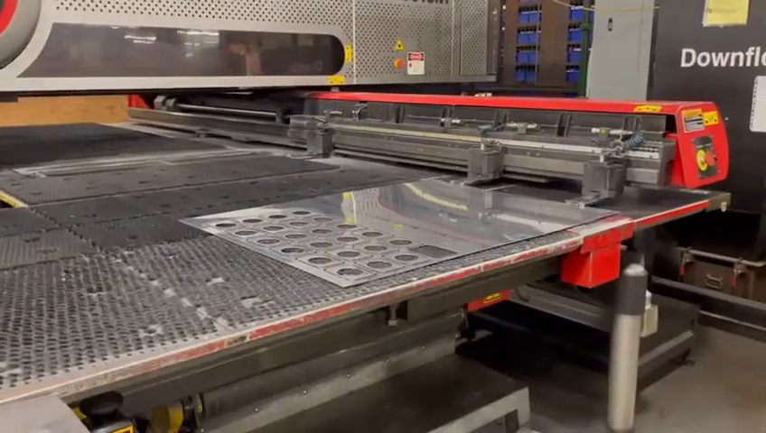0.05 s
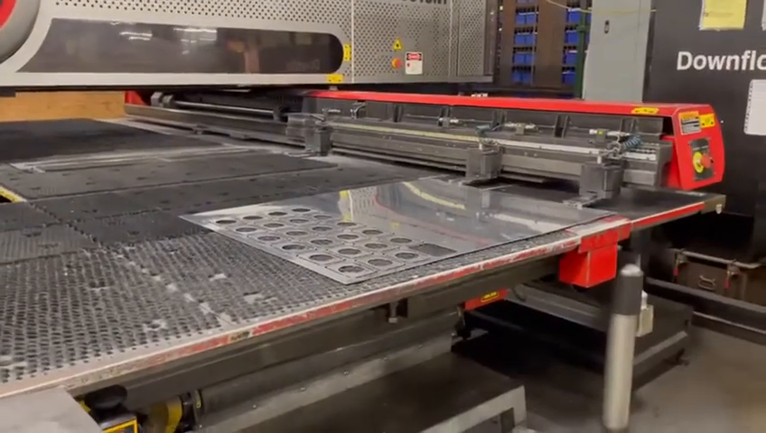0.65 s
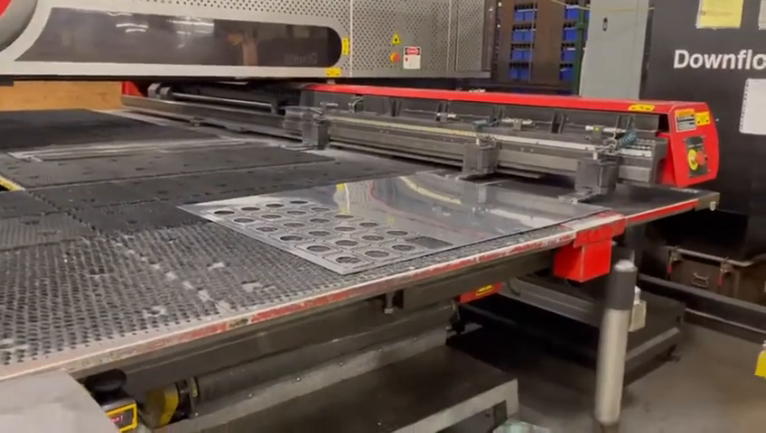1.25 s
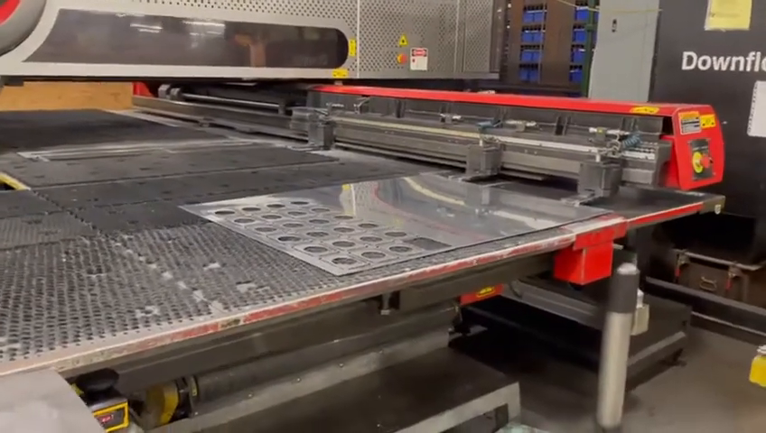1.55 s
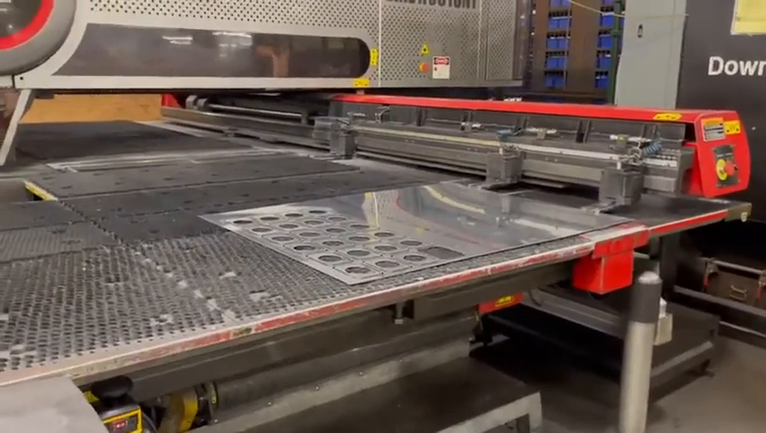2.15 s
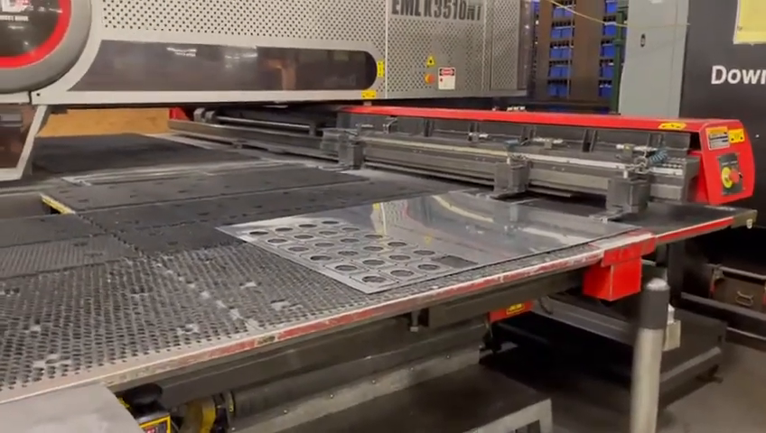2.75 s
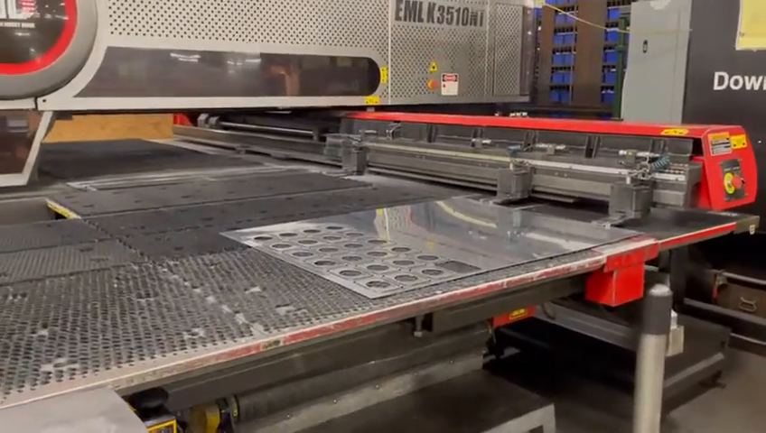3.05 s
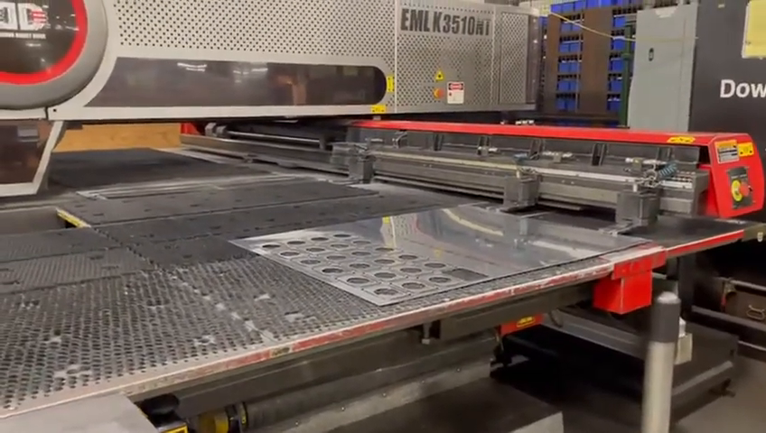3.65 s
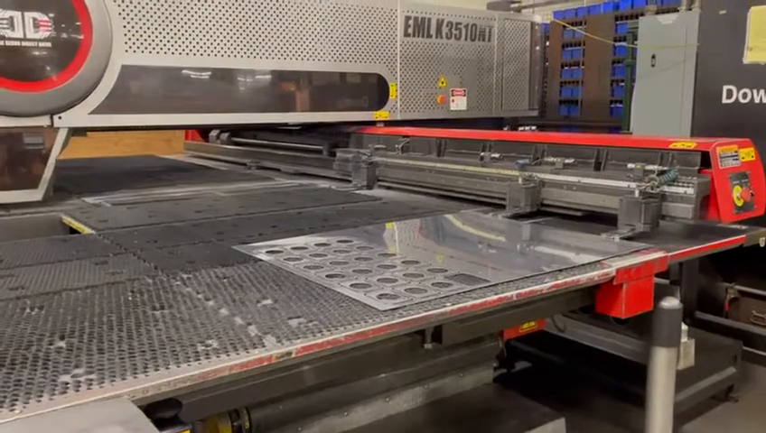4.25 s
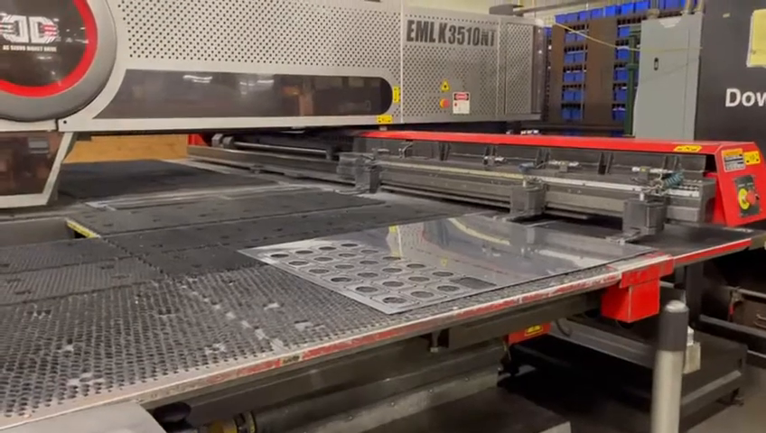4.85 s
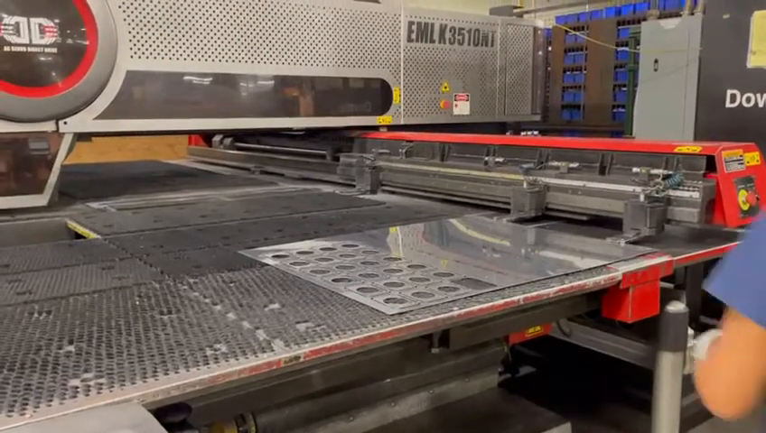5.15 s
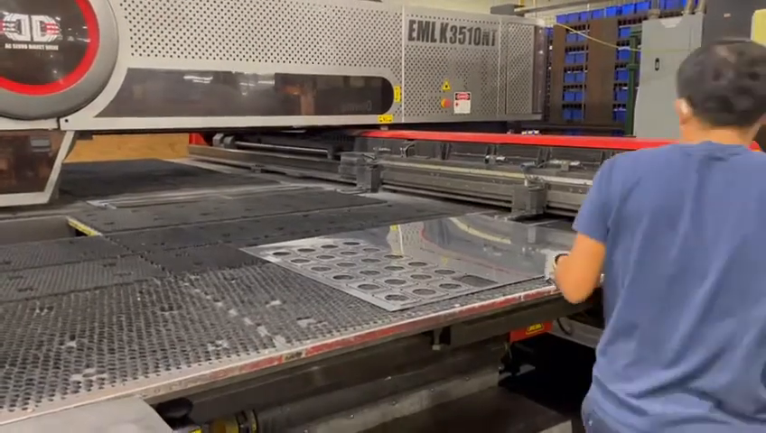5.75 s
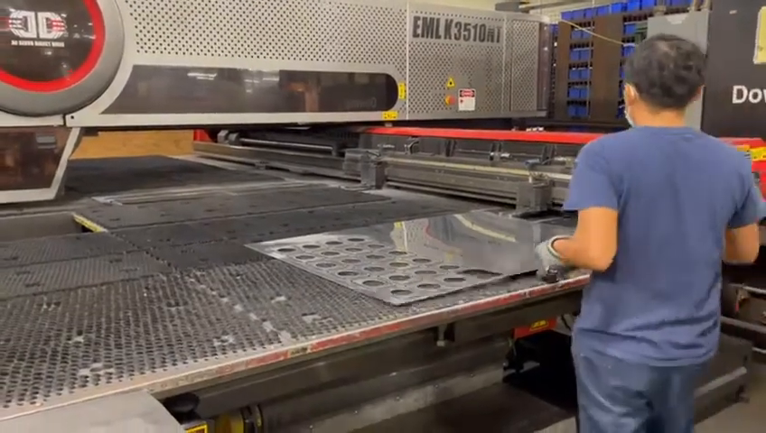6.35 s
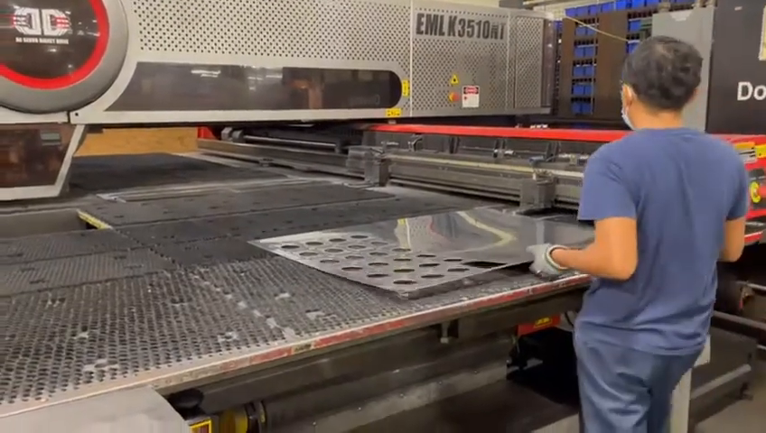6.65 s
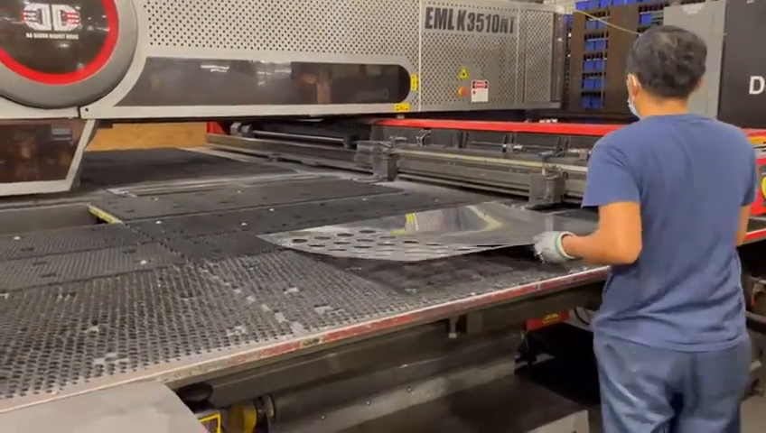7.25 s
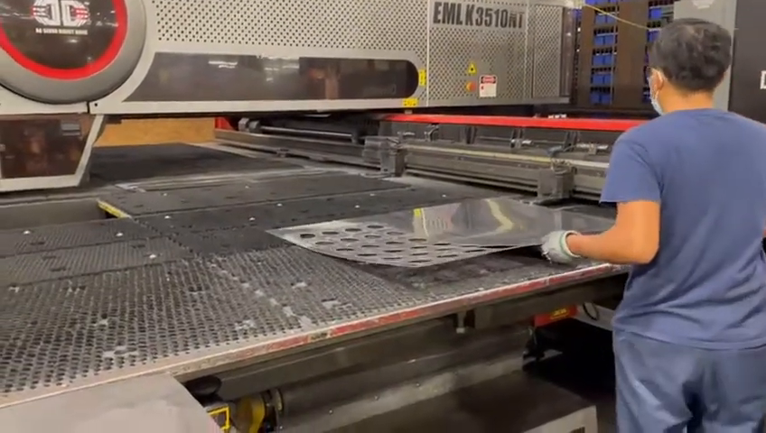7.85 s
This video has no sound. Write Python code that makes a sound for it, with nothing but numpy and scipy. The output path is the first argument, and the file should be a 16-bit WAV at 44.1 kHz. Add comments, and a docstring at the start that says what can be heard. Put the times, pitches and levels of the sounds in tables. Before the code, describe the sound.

A large punch press idles in a workshop hall from start to finish, heard in stereo. Its motors make a low, throbbing hum under the broad roar of a cooling fan. A pump hum and other tones waver slightly, with a faint high whine and occasional soft swells of hiss. Faint, dull knocks come from the housing at about 1.6, 2.3, 3.7 and 4.5 seconds. At about 6.5 seconds, a thin perforated steel sheet is lifted from the table. It drags with a light gritty hiss, bends with short hollow wobbles, and strikes the table in a quick, uneven run of metallic clatters and dry clacks that stand out above the machine. Each contact rings briefly with a short hall echo. The clatter is busiest until about 7.4 seconds, followed by a last wobble, a soft scrape and a lighter tap near 7.7 seconds as the hum continues.

```python
"""A workshop hall, where a turret punch press idles: two big motors throb, a pump hums, a cooling fan
roars, the servo drives whine and the housing gives a few dull knocks.
Near the end a worker lifts a perforated steel sheet. It drags with a gritty hiss, wobbles as it bends,
and clatters and clacks on the table. Each chattering contact rings the sheet's modes and the hall."""
import sys
import numpy as np
from scipy import signal
from scipy.fft import rfft, irfft, next_fast_len
from scipy.io import wavfile
from scipy.ndimage import map_coordinates

SR = 44100
rng = np.random.default_rng(int(sys.argv[2]) if len(sys.argv) > 2 else 0)


def transcribe(u):
    """Save the signal u as a 16-bit wav file named by the first command-line argument.

    u: samples, shape (n,) or (channels, n), limited to [-1, 1]; the rate is SR.
    q: integer samples, one column per channel.
    """
    v = np.clip(np.atleast_2d(u).T, -1, 1)
    q = np.round(v * 32767).astype(np.int16)
    wavfile.write(sys.argv[1], SR, q)


N = 348831
TIME = np.arange(N) / SR


def amp(db):
    """Decibels to gain."""
    return 10 ** (np.asarray(db) / 20)


def unit(x):
    """x at rms 1."""
    return x / np.sqrt(np.mean(x ** 2) + 1e-20)


def along(points, hz):
    """(f/Hz, value) points read on a log frequency axis."""
    f, v = np.transpose(points)
    return np.interp(np.log(hz + 1), np.log(f + 1), v)


def automation(points):
    """(t/s, value) points joined by straight ramps."""
    return np.interp(TIME, *np.transpose(points))


def bump(s, half_s):
    """A smooth rise and fall around second s."""
    return np.exp(-((TIME - s) / half_s) ** 2)


def swells(rows):
    """A gain envelope with one bump for each (t/s, half length/s, level/dB)."""
    return sum(amp(db) * bump(s, half_s) for s, half_s, db in rows)


def wobble(rate, size=N):
    """A smooth random curve, rate knots a second."""
    knots = rng.standard_normal(int(size * rate / SR) + 4)
    return map_coordinates(knots, [np.arange(size) * rate / SR])


def filtered(x, response):
    """x through an EQ given as gain against frequency."""
    size = next_fast_len(N + SR // 2)
    return irfft(rfft(x, size) * response(np.fft.rfftfreq(size, 1 / SR)), size)[..., :N]


def bandpass(x, low_hz, high_hz):
    """x through a gentle band filter."""
    return signal.sosfilt(signal.butter(2, [low_hz, high_hz], "bandpass", fs=SR, output="sos"), x)


def noise(response):
    """Two unrelated noises of rms 1 with the same colour."""
    return unit(filtered(rng.standard_normal((2, N)), response))


def add(track, s, sound):
    """Mix a sound into a track from second s."""
    room = track[:, round(s * SR):][:, :sound.shape[1]]
    room += sound[:, :room.shape[1]]


# stereo width by frequency, with opposite phase around 8 kHz: f/Hz, left-right correlation
CORRELATION = [(70, 1), (330, .83), (550, .36), (1100, .26), (1600, 0), (2100, .4), (2800, .28),
               (4200, .58), (5400, .32), (6600, .8), (7600, -1), (9200, -1), (10000, .5), (10600, 1)]

def stereo(pair):
    """Two unrelated signals become mid and side, then left and right; width varies with frequency."""
    def shares(hz):
        turn = np.arccos(np.clip(along(CORRELATION, hz), -1, 1)) / 2
        return np.array([np.cos(turn), np.sin(turn)])
    mid, side = filtered(pair, shares)
    return np.array([mid + side, mid - side])


# pitch of the drone: t/s, f/Hz
DRONE_HZ = [(0, 59.3), (1.3, 60.3), (2.3, 59.5), (3.9, 60), (4.8, 59.6), (5.6, 61), (6.3, 61.3),
            (6.7, 59.5)]
# irregular swells of the low hum: peak t/s, half length/s, added level/dB
DRONE_SWELLS = [(.33, .04, -22), (.43, .04, -20), (.56, .035, -22), (1.12, .035, -21), (1.55, .04, -19),
                (1.75, .04, -22), (2.11, .04, -24), (2.87, .035, -22), (3.92, .035, -19), (4.66, .08, -16),
                (4.83, .12, -18), (5.12, .035, -23), (5.25, .035, -19), (5.39, .07, -23), (5.81, .04, -14),
                (6.2, .035, -21), (6.36, .035, -19)]

def drone(level_db=-24, second_db=-3, wander_hz=.8, throb_hz=6.86, first_throb_s=.11):
    """Two big motors run at slightly different speeds, so their hum throbs; now and then it swells."""
    phase = 2 * np.pi * np.cumsum(automation(DRONE_HZ) + wander_hz * wobble(7)) / SR
    beat = 2 * np.pi * throb_hz * (TIME - first_throb_s) + .6 * wobble(3)
    swell = swells(DRONE_SWELLS)
    first = np.sin(phase)
    second = amp(second_db) / (1 + swell / amp(level_db)) * np.sin(phase - beat)
    return amp(level_db) * unit(first + second) + swell * first


# colours of the roar and of the air hiss: f/Hz, relative level/dB
ROAR_EQ = [(20, -27), (40, -12), (55, -2), (68, -.5), (80, -2.5), (100, -4), (116, -4.5), (138, -8.5),
           (165, -8.5), (192, -11.5), (222, -11.5), (255, -8), (292, -9.5), (322, -13.5), (385, -10.5),
           (440, -14), (510, -15.5), (680, -17.5), (780, -18), (880, -20), (980, -22.5), (1160, -22),
           (1300, -24.5), (1390, -22.5), (1480, -24.5), (2000, -27.5), (3000, -33), (5500, -37.5),
           (11500, -48.5)]
HISS_EQ = [(600, -20), (1400, -1), (2700, 0), (4500, -22)]
# breaths of hiss: peak t/s, half length/s, level/dB
HISS_SWELLS = [(1.2, .1, -43), (2.267, 0.11, -39.5), (4.563, 0.091, -42), (4.85, .12, -43), (5.2, .2, -42),
               (6.296, .15, -46)]

def air_roar():
    """Rushing air and machinery make a broad, slightly fluttering bed, with soft swells of hiss."""
    level_db = -19 + .38 * wobble(7.8) + .1 * wobble(.91)
    roar = amp(level_db) * noise(lambda hz: amp(along(ROAR_EQ, hz)))
    hiss = swells(HISS_SWELLS) * noise(lambda hz: amp(along(HISS_EQ, hz)))
    return roar + hiss


# the two lower blade tones: f/Hz, half width/Hz, relative level/dB
BLADE_TONES = [(278.6, 5.5, -39), (557.5, 7, -38)]
# fader of the top blade tone: t/s, level/dB
TOP_BLADE_FADER = [(.15, -35), (1.0, -44), (2.1, -36), (2.7, -39.5), (3.4, -35), (4.05, -42), (4.4, -37),
                   (7.9, -37)]

def fan_blades(top_hz=837.5, top_width_hz=9):
    """The fan's blades sing three fuzzy tones, each a narrow band of noise."""
    def fuzzy(centre, width):
        return noise(lambda hz: 1 / (1 + ((hz - centre) / width) ** 2))
    lower = amp(1.5) * sum(amp(db) * fuzzy(centre, width) for centre, width, db in BLADE_TONES)
    return lower + amp(automation(TOP_BLADE_FADER)) * fuzzy(top_hz, top_width_hz)


# hum of motors, mains and panels: f/Hz, level/dB
HUM_TONES = [(83.4, -32), (88.8, -35), (156, -38), (176.5, -41), (204.8, -40), (235.5, -40), (298.8, -39),
             (354, -38), (418.6, -45), (467, -48), (472.4, -47), (599, -49), (1147, -45.5), (1164, -51),
             (1300, -50), (1844, -56), (1939, -56), (2064, -57), (2293, -57), (2523, -56), (2752, -58)]

def hum(lines=HUM_TONES, waver=.35, rate=2.5):
    """Held tones whose strength and phase drift slowly in the hall's standing waves."""
    out = np.zeros((2, N))
    knots = np.arange(0, N / SR + 1, 1 / rate)
    for hz, db in lines:
        carrier = np.exp(2j * np.pi * hz * TIME)
        for channel in out:
            start = np.exp(2j * np.pi * rng.random())
            drift = waver * (rng.standard_normal((len(knots), 2)) @ [1, 1j])
            channel += amp(db) * unit((np.interp(TIME, knots, start + drift) * carrier).real)
    return out


# faders of the four tones below: t/s, level/dB
PUMP = [(0.0, -26), (1.06, -31), (1.14, -45), (1.58, -25.5), (1.84, -34.5), (2.42, -26.5), (2.54, -30.5),
        (2.88, -30), (3.0, -41), (3.1, -32.5), (3.52, -30.5), (3.82, -40), (3.96, -32), (4.24, -35),
        (4.46, -20.5), (4.56, -44), (4.96, -28), (5.1, -42), (5.2, -35), (5.7, -40), (6.08, -23),
        (6.26, -50), (6.42, -36), (6.68, -30.5), (7.36, -28), (7.5, -37), (7.58, -32), (7.84, -33)]
FAN = [(0.0, -35.5), (1.06, -28), (1.54, -43), (1.72, -30.5), (2.74, -42), (3.12, -27.5), (3.66, -30.5),
       (4.66, -31.5), (4.92, -26), (5.1, -40), (5.34, -30), (5.52, -40), (5.72, -29), (6.3, -33.5),
       (6.52, -43), (6.7, -31), (7.12, -30), (7.34, -45), (7.48, -25.5), (7.84, -33.5)]
MOTOR = [(0.0, -34), (0.82, -41), (1.4, -36.5), (2.34, -36.5), (2.86, -44), (3.3, -37), (3.92, -57),
         (6.36, -52), (7.84, -41)]
WHISTLE = [(0.0, -51), (0.76, -53), (1.28, -42), (1.62, -49), (1.92, -43), (2.46, -48), (2.64, -46),
           (3.34, -52), (3.86, -55), (4.26, -56), (4.46, -46), (6.38, -50), (6.48, -48)]
# tones that come and go: f/Hz, wander/Hz, wander rate/Hz, fader
SWELLING_TONES = [(207.5, 2, 9, PUMP), (278.3, 4.5, 22, FAN), (530.3, .5, 3, MOTOR), (2050, 3, 12, WHISTLE)]

def swelling_tones():
    """Pump hum, a blade tone, a motor's note and a thin whistle rise and fall, wandering in pitch."""
    out = np.zeros((2, N))
    for hz, wander_hz, rate, fader in SWELLING_TONES:
        pitch = hz + wander_hz * np.array([wobble(rate), wobble(rate)])
        cycles = np.cumsum(pitch, axis=1) / SR + rng.random((2, 1))
        out += amp(automation(fader)) * unit(np.sin(2 * np.pi * cycles))
    return out


# one comb per servo drive: middle f/Hz, level/dB, lines on either side
SERVO_COMBS = [(3200, -56, 2), (4200, -58.5, 5), (7600, -61.5, 3)]

def servo_whine(step_hz=600, fall_db=.15):
    """Each drive sings a middle line and evenly spaced side lines, a touch softer with each step."""
    lines = [(hz + k * step_hz, db - fall_db * abs(k))
             for hz, db, count in SERVO_COMBS for k in range(-count, count + 1)]
    return hum(lines, waver=.25, rate=1.5)


# fader of the rumble above the drone: t/s, relative level/dB
RUMBLE_FADER = [(0, -25), (1.3, -25.5), (2.9, -25.5), (3.55, -23.5), (3.8, -21.5), (4.1, -24.5),
                (4.7, -25.5), (5.3, -23.5), (6.4, -25), (7.2, -23), (7.9, -26)]
# brief dips of the bass: centre t/s, half length/s, gain/dB
BASS_DIPS = [(4.42, 0.15, -6), (6.44, .03, -10), (7.05, .08, -2)]

def idling_press(bass_top_hz=76, rumble_top_hz=150):
    """The machine bed in three bands: steady on top, a swelling rumble, and a bass that dips at times."""
    bed = stereo(air_roar() + fan_blades() + hum() + swelling_tones() + servo_whine())
    bass = filtered(bed, lambda hz: 1 / (1 + (hz / bass_top_hz) ** 20))
    rumble = filtered(bed - bass, lambda hz: 1 / (1 + (hz / rumble_top_hz) ** 20))
    upper = bed - bass - rumble
    rumble_db = automation(RUMBLE_FADER)
    dip_db = sum(db * bump(s, half_s) for s, half_s, db in BASS_DIPS)
    return upper + amp(rumble_db - rumble_db.mean()) * rumble + amp(dip_db) * (bass + drone())


# knocks in the machine: t/s, pre-filter level/dB, resonance f/Hz, t60/s
HOUSING_KNOCKS = [(1.604, -16, 900, .04), (2.33, -17, 1300, .04), (3.73, -2, 120, .7),
                  (4.546, -5, 720, .03)]

def housing_knocks():
    """Faint dull knocks from inside the housing, each through one broad resonance."""
    t, out = TIME[:SR // 2], np.zeros((2, N))
    for s, db, hz, t60 in HOUSING_KNOCKS:
        burst = amp(db - 60 * t / t60) * rng.standard_normal((2, len(t)))
        add(out, s, bandpass(burst, hz / 2, hz * 2))
    return stereo(out)


# colour of the scrape: f/Hz, relative level/dB
GRIT_EQ = [(1000, -20), (3000, -2), (4500, 0), (6800, -2), (10000, -23)]
# light drags: peak t/s, half length/s, level/dB
DRAGS = [(6.48, .06, -50), (6.76, 0.089, -40), (7.6, .2, -46)]

def sheet_scrapes(grain_db=2):
    """The sheet drags lightly over the table with a gritty hiss."""
    hiss = noise(lambda hz: amp(along(GRIT_EQ, hz)))
    grit = unit(hiss * amp(grain_db * wobble(150)))
    return stereo(grit * swells(DRAGS))


# hollow wobbles: peak t/s, f/Hz, glide/(octaves a second), half length/s, level/dB
BENDS = [(6.44, 596, -1, 0.046, -33), (6.834, 676, .3, 0.047, -28), (7.156, 803, 0.57, 0.043, -27),
         (7.54, 428.6, -1.66, 0.091, -26.5)]

def sheet_bends(rough_rad=.61):
    """Bending changes the sheet's stiffness, so a low mode swells and glides."""
    out = np.zeros((2, N))
    for s, hz, glide, half_s, db in BENDS:
        pitch = hz * 2 ** (glide * np.clip(TIME - s, -.2, .2))
        jitter = rough_rad * np.array([wobble(97), wobble(90)])
        phase = 2 * np.pi * (np.cumsum(pitch) / SR + rng.random((2, 1)))
        out += amp(db) * bump(s, half_s) * unit(np.sin(phase + jitter))
    return stereo(out)


# hard edge strikes: t/s, centre f/Hz, level/dB
EDGE_STRIKES = [(6.566, 1150, -18), (6.567, 3600, -20), (6.602, 1180, -15), (6.661, 2100, -22),
                (6.814, 1050, -15), (6.817, 2500, -21), (7.039, 2000, -15), (7.172, 1150, -16),
                (7.207, 1900, -18), (7.256, 3220, -16), (7.326, 1800, -16), (7.352, 2700, -19),
                (7.42, 2150, -10.5)]

def edge_clacks(band_ratio=1.17, attack_s=.003, t60=.055):
    """Where an edge strikes hard, that spot of the sheet gives a dry clack."""
    t, out = TIME[:SR // 4], np.zeros((2, N))
    for s, hz, db in EDGE_STRIKES:
        rattle = unit(bandpass(rng.standard_normal((2, len(t))), hz / band_ratio, hz * band_ratio))
        envelope = amp(db - 60 * t / t60) * (1 - np.exp(-t / attack_s))
        add(out, s, rattle * envelope)
    return stereo(out)


# reverb time of the hall: f/Hz, t60/s
HALL_DECAY = [(300, 0.55), (2000, 1), (5000, 1), (10000, 0.15)]

def hall_tail(t):
    """The hall's answer: two unrelated noise tails of energy about 1; the top treble dies first."""
    hz, when, spectrum = signal.stft(rng.standard_normal((2, len(t))), SR, nperseg=256)
    decay = amp(-60 * when / along(HALL_DECAY, hz)[:, None])
    tail = signal.istft(spectrum * decay, SR, nperseg=256)[1][:, :len(t)]
    return tail / np.linalg.norm(tail[0])


# the sheet's clearest modes: f/Hz, relative level/dB, t60/s
SHEET_MODES = [(791, 0, .38), (1190, -1, .35), (1405, -3, .3), (1595, -3, .3), (2065, -5, .4),
               (2160, -5, .35), (3256, -5, .35), (3381, -6, .3), (3918, -5, .3), (4163, -5, .3),
               (5055, -6, .3), (6643, -9, .25)]

def sheet_ring(t):
    """The modes ring on after a blow, in a new balance each time, at energy about 1."""
    ring = np.zeros((2, len(t)))
    for hz, db, t60 in SHEET_MODES:
        envelope = amp(db + rng.normal(0, 2.4) - 60 * t / t60)
        ring += envelope * np.sin(2 * np.pi * (hz * t + rng.random((2, 1))))
    return ring / np.linalg.norm(ring[0])


# colour of the steel: f/Hz, gain/dB
STEEL_EQ = [(150, -22), (400, 7), (800, 0.5), (1300, 3.5), (2500, 1.2), (4500, 0.5), (7000, -2.5),
            (9000, -4.5), (11500, -5.5)]
# hits on table and clamps: t/s, relative level/dB, low-pass f/Hz, chatter t60/s
SHEET_HITS = [(6.501, -28, 11000, .05), (6.564, -14.5, 11100, .04), (6.597, -23, 4500, .13),
              (6.657, -25, 9000, .06), (6.811, -20, 3000, .11), (6.892, -27, 9050, .058),
              (6.969, -17.5, 10500, 0.13), (6.981, -19, 5800, .45), (7.046, -22, 4600, .45),
              (7.13, -23, 2000, .65), (7.181, -29, 11000, .04), (7.252, -19, 2600, .07),
              (7.308, -19, 2400, .2), (7.345, -19.5, 2500, .11), (7.416, -14.5, 2300, .055),
              (7.736, -26, 3000, .1)]

def sheet_clatter(grain_db=2, ring_db=-13, hall_db=-4, makeup_db=7.7):
    """Each contact is a dense, dying chatter that feeds the sheet's modes and the hall."""
    t, out = TIME[:SR], np.zeros((2, N))
    landing = 1 - np.exp(-t / .005)  # the limp edge lands over a few milliseconds
    for s, db, cutoff_hz, t60 in SHEET_HITS:
        force = amp(db - 60 * t / t60) * landing
        chatter = force * unit(rng.standard_normal((2, SR)) * amp(grain_db * wobble(600, size=SR)))
        build_up = np.sqrt(np.cumsum(force ** 2))  # the tails grow with the energy fed in so far
        tails = build_up * (amp(ring_db) * sheet_ring(t) + amp(hall_db) * hall_tail(t))
        lowpass = signal.butter(2, cutoff_hz, fs=SR, output="sos")
        add(out, s, signal.sosfilt(lowpass, chatter + tails))
    return amp(makeup_db) * stereo(filtered(out, lambda hz: amp(along(STEEL_EQ, hz))))


def scene():
    """The sheet over the idling press; lows and mids lean to the right, the hiss to the left."""
    mix = (idling_press() + sheet_clatter() + edge_clacks()
           + sheet_scrapes() + sheet_bends() + housing_knocks())
    lean = [(70, -0.5), (1000, -0.7), (2000, -1.0), (4500, 3.0), (6500, 0)]  # f/Hz, left minus right/dB
    return filtered(mix, lambda hz: amp(np.outer([1, -1], along(lean, hz)) / 2))


def record(dry, top_hz=11750):
    """A brick-wall low-pass takes off the highest treble."""
    return filtered(dry, lambda hz: hz < top_hz)


dry = scene()
out = record(dry)
transcribe(out)
```